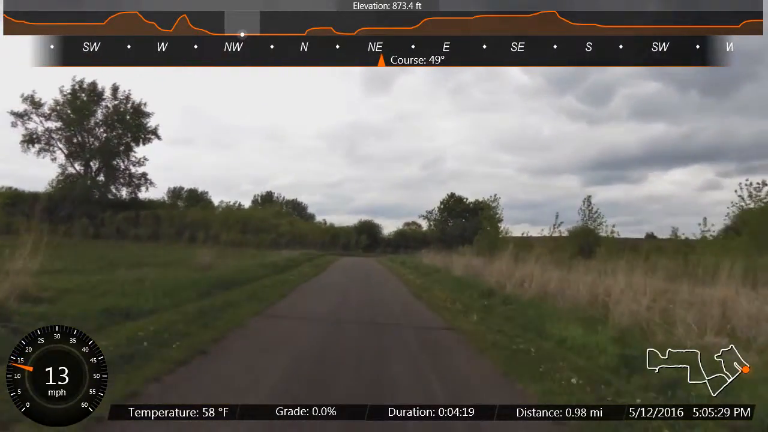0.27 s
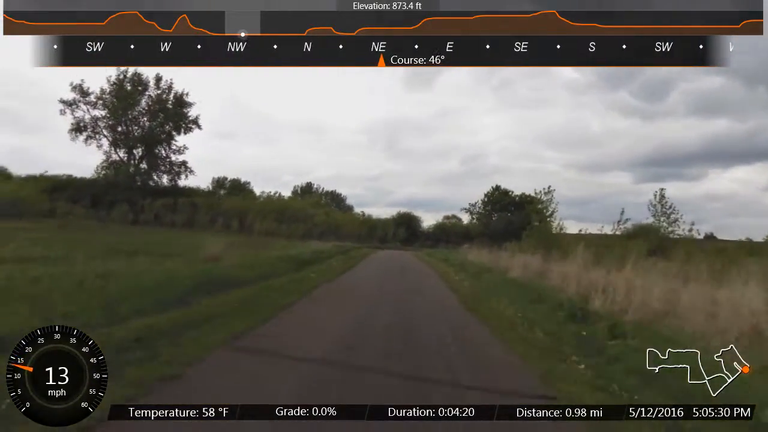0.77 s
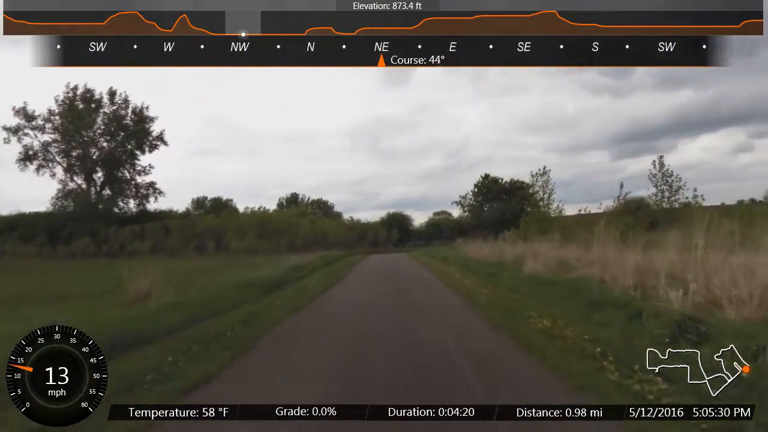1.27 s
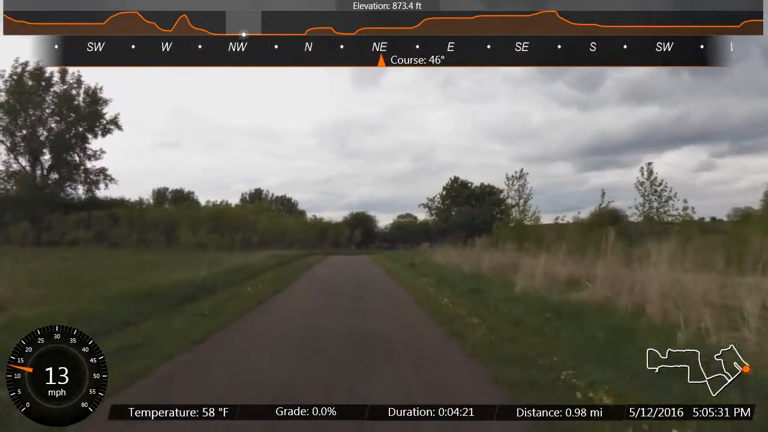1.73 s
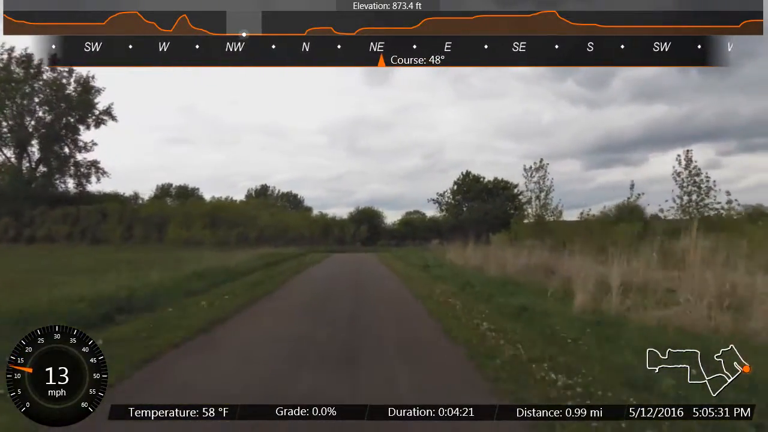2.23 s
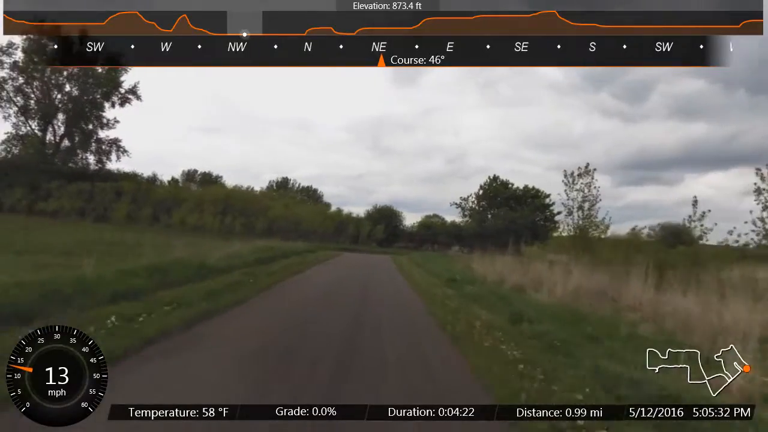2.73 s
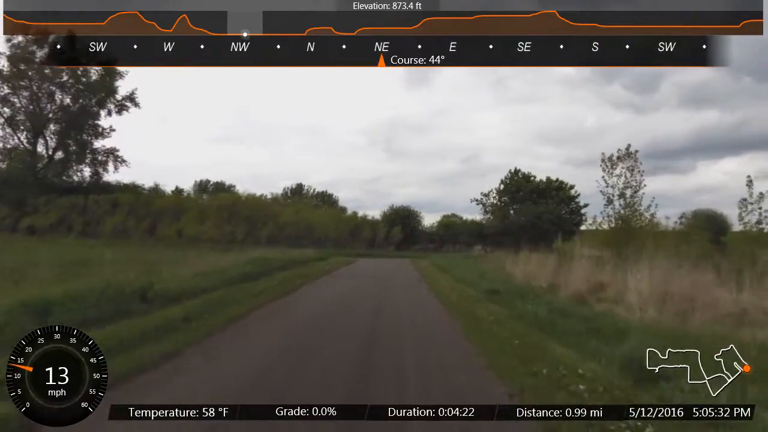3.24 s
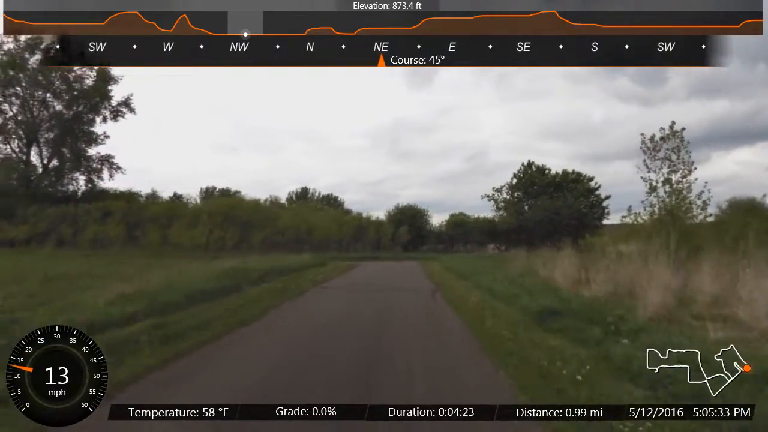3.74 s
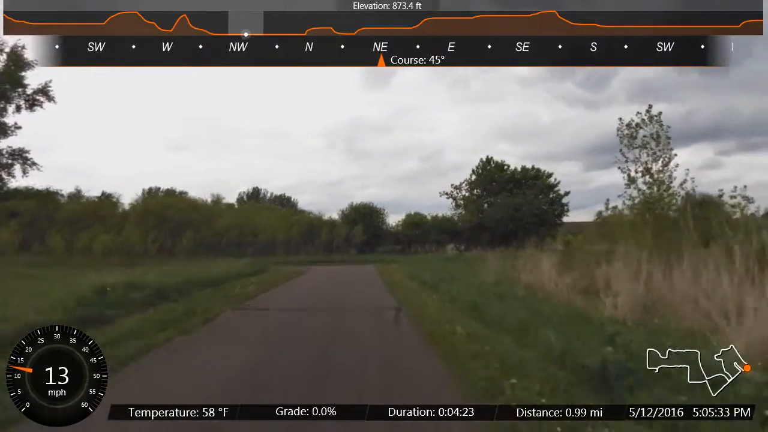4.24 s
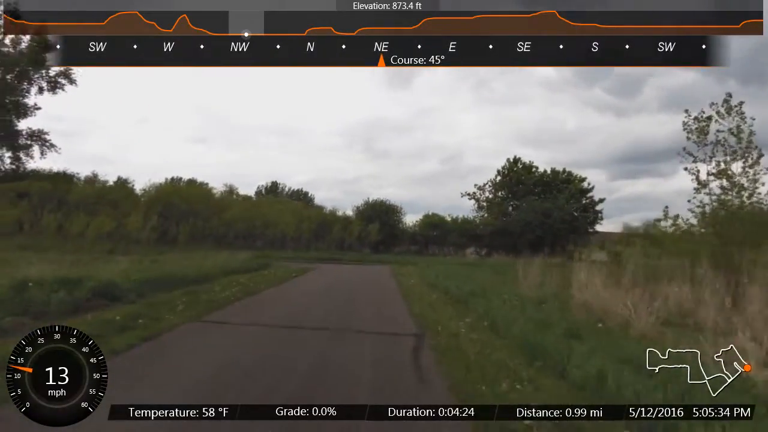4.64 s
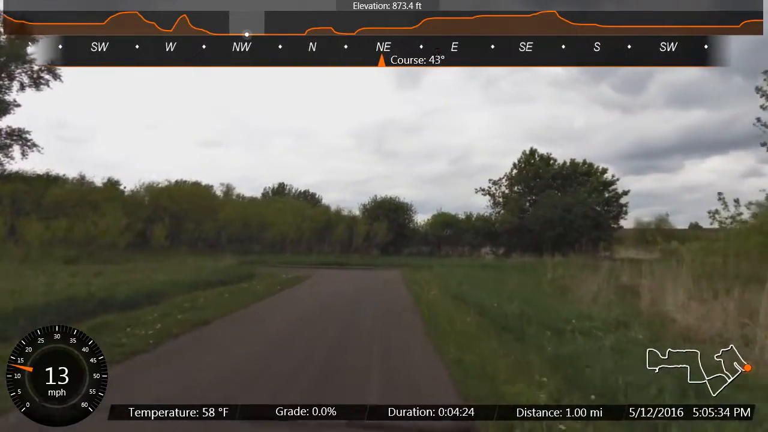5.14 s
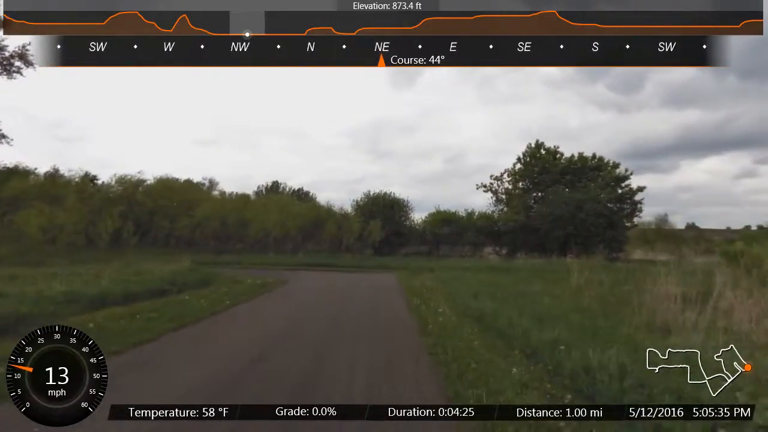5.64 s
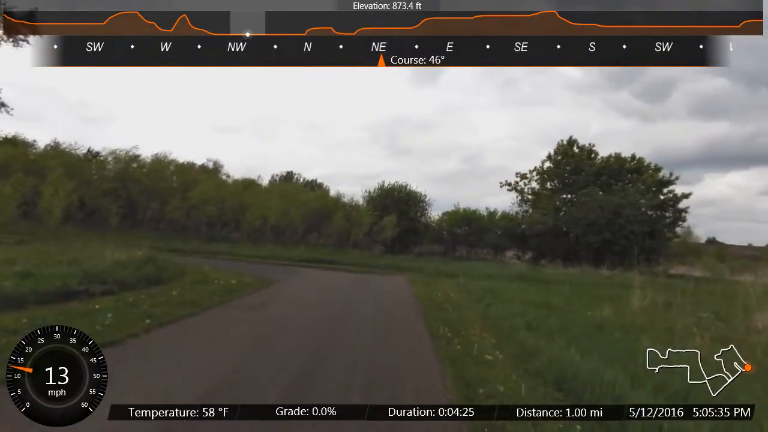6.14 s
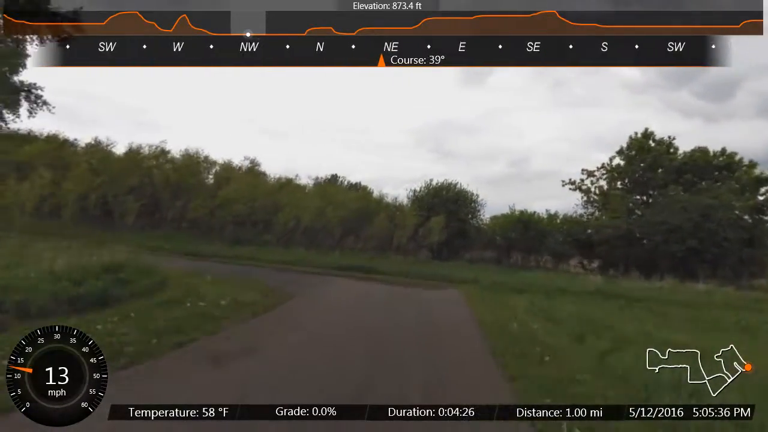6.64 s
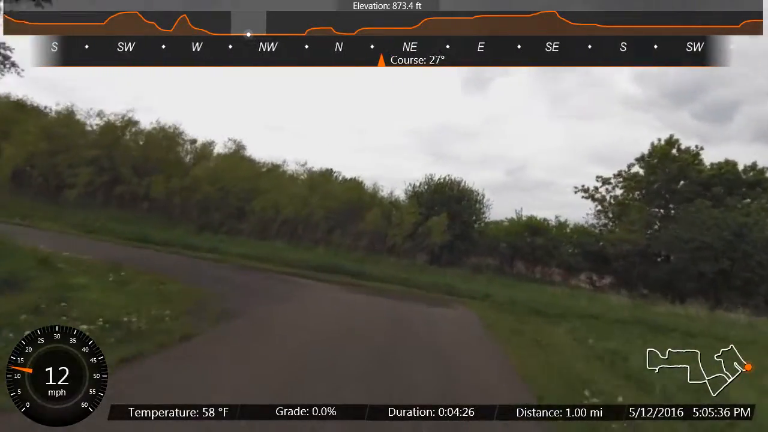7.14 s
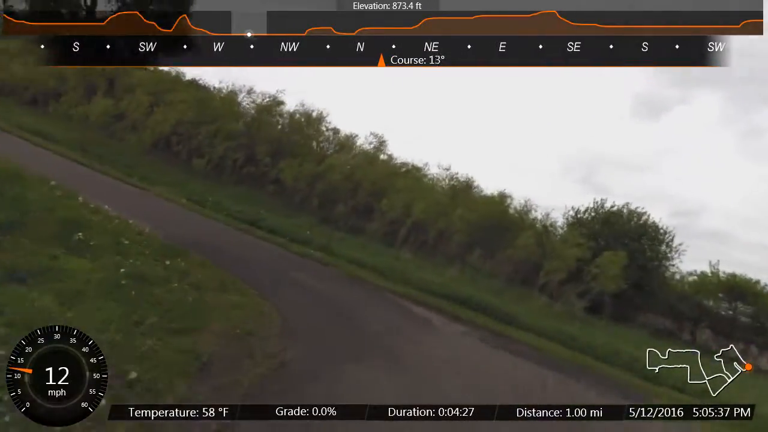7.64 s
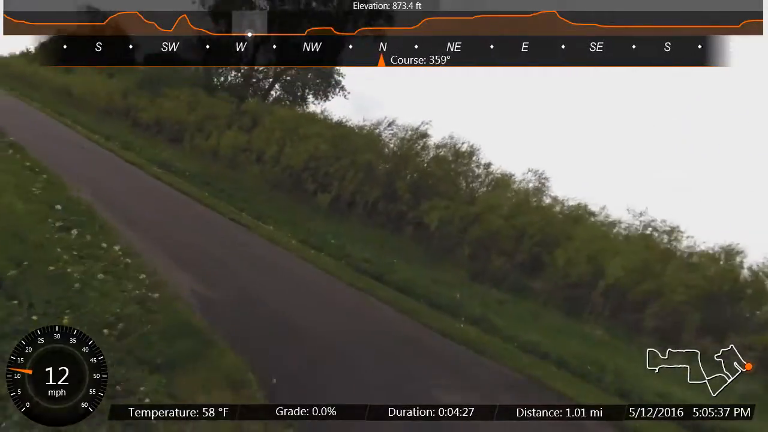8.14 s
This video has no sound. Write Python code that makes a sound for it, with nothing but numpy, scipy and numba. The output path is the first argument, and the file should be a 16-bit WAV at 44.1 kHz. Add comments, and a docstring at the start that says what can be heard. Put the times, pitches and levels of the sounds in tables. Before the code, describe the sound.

Continuous boxy rumble of bicycle tyres on a paved path, close and muffled by the microphone's plastic case. Low wind puffs buffet it while the chain chatters softly and grit ticks. Sharp taps precede two quick thuds as both wheels cross a crack. Smooth rolling follows, then a heavier crunching double blow that distorts and briefly ducks the sound, more rolling, and a final knock.

```python
"""A bicycle rolls along a paved path, heard by a microphone in a plastic case on the handlebar.
From the start asphalt grain makes the case drone near 280 Hz, the chain chatters, grit ticks and gusts buffet low.
Loose parts click and tap; soon, again past the middle and at the very end, a wheel drops into a crack.
The rear wheel follows the front one through the first two: the mount knocks, fittings rattle,
the blows overload the microphone and the gain ducks."""
import sys
import numpy as np
from scipy import signal
from scipy.fft import rfft, irfft
from scipy.io import wavfile
from scipy.ndimage import uniform_filter1d
from numba import njit

SR = 44100
rng = np.random.default_rng(int(sys.argv[2]) if len(sys.argv) > 2 else 0)


def put_to_file(sound):
    """Save the sound as 16-bit audio at rate SR, in the file named by the first command-line argument."""
    columns = np.atleast_2d(sound).T  # one column per channel
    safe = np.clip(columns, -1, 1)
    whole_steps = np.round(safe * 32767)
    wavfile.write(sys.argv[1], SR, whole_steps.astype(np.int16))


N = 370422
TIME = np.arange(N) / SR

# spectrum of hard contacts, for clicks and cracks: (frequency [Hz], relative level [dB per Hz])
CONTACT_SPECTRUM = [(100, -26.5), (600, -15), (1100, 7), (3000, 7.5), (5400, 1), (6500, -17.5),
                    (11000, -46), (16000, -44)]


def undb(db):
    """Decibels to gain."""
    return 10 ** (np.asarray(db) / 20)


def unit(x):
    """Scale to rms 1."""
    return x / np.sqrt(np.mean(x ** 2))


def walk(rate):
    """Random levels held 1 / rate s and smoothed twice, rms 1."""
    hold = max(int(SR / rate), 1)
    steps = np.repeat(rng.standard_normal(N // hold + 1), hold)
    smooth = uniform_filter1d(uniform_filter1d(steps, hold), hold)
    return unit(smooth[:N])


def butter(x, hz, kind, order=2):
    """Plain low- or high-pass."""
    return signal.sosfilt(signal.butter(order, hz, kind, fs=SR, output="sos"), x)


def through_case(x, spectrum, ring=1, size=8192):
    """Colour x with a smooth spectrum and the resonances of the case, as a causal response."""
    # resonances of case and mount: (centre [Hz], width [Hz], lift [dB at ring=1])
    resonances = [(271.6, 80.7, 14.5), (331, 180, 5), (527.5, 30, 5), (674.5, 130, 8), (946.6, 89, 9.5),
                  (1221, 103, 12), (1387, 190, 9.5), (1947, 170, 8.5), (2557, 200, 11.5), (3334, 180, 13),
                  (3960, 140, 6.5), (4220, 380, 1.5), (4874, 550, 11.5), (5300, 160, 3.5), (5740, 230, 7)]
    f = np.maximum(np.fft.rfftfreq(size, 1 / SR), 1)
    hz, db = np.transpose(spectrum)
    db = np.interp(np.log(f), np.log(hz), db)
    db = db + ring * sum(lift / (1 + (2 * (f - centre) / width) ** 2) for centre, width, lift in resonances)
    # folding the cepstrum gives the minimum-phase response
    cepstrum = irfft(np.log(undb(db)))
    cepstrum[1:size // 2] *= 2
    cepstrum[size // 2 + 1:] = 0
    response = irfft(np.exp(rfft(cepstrum)))[:size // 2]
    return signal.oaconvolve(x, response)[:len(x)]


def add(out, start, sound):
    """Mix a sound in at a time in seconds."""
    i = int(max(start, 0) * SR)
    out[i:i + len(sound)] += sound[:max(N - i, 0)]


def grains(rate, spread_db):
    """Random tiny impacts, rate per second, a few much larger than the rest."""
    hit = rng.random(N) < rate / SR
    size_db = spread_db * np.minimum(rng.exponential(size=N), 4)
    return unit(hit * rng.choice([-1, 1], N) * undb(size_db))


def tyres(drone_db, roar_db):
    """Asphalt grain drums through fork and bar: a low drone of the mount with a roar above it."""
    # spectrum of the asphalt's shaking: (frequency [Hz], relative level [dB per Hz])
    asphalt_spectrum = [(20, -30.5), (55, -5), (100, -3), (200, -6), (300, 0.5), (420, -11), (600, -12),
                        (820, -19.5), (1100, -27.5), (1700, -39.5), (3000, -57), (5800, -55.5), (6500, -71),
                        (9000, -100)]
    shaking = grains(rate=4000, spread_db=3.0) * undb(0.85 * walk(40))
    road = through_case(shaking, asphalt_spectrum)
    drone = butter(road, 400, "low", order=4)
    roar = butter(road, 412.6, "high", order=4)
    return unit(drone) * undb(drone_db) + unit(roar) * undb(roar_db)


def chain(db, bursts_hz=19.5, burst_cycles=0.2):
    """Links chatter over the sprockets in uneven bursts, about twenty a second."""
    # spectrum of the chatter: (frequency [Hz], relative level [dB per Hz])
    link_spectrum = [(300, -23.5), (1200, 2.5), (2000, -2), (3200, -4.5), (4200, -13), (5800, -14.5),
                     (6500, -21.5), (8500, -59)]
    phase = np.cumsum(bursts_hz * (1 + .04 * walk(3.3))) / SR
    age = (phase % 1) / burst_cycles
    height_db = 6.3 * np.clip(rng.standard_normal(N)[phase.astype(int)], -2, 2)  # one draw per burst
    burst = (age * np.exp(1 - age)) ** 2 * undb(height_db)
    links = grains(rate=1800, spread_db=2.0) * (0.63 + burst)
    return unit(through_case(links, link_spectrum)) * undb(db)


def flecks(rate, spread_db, ring_s=0.002, size=1024, count=18):
    """Tiny contacts at many places, each place ringing briefly at a pitch of its own; rms 1."""
    # spectrum that colours the contacts, the chain's own: (frequency [Hz], relative level [dB per Hz])
    fleck_spectrum = [(300, -23.5), (1200, 2.5), (2000, -2), (3200, -4.5), (4200, -13), (5800, -14.5),
                      (6500, -21.5), (8500, -59)]
    t = np.arange(size) / SR
    pitches_hz = np.linspace(1200, 6000, count) * (1 + .02 * rng.standard_normal(count))
    contacts = np.zeros(N)
    for hz in pitches_hz:
        ring = np.sin(2 * np.pi * hz * t) * np.exp(-t / ring_s)
        contacts += signal.oaconvolve(grains(rate, spread_db), ring)[:N]
    return unit(through_case(contacts, fleck_spectrum, ring=0.7))


def grit(db=-58, rate=10):
    """Loose specks on the asphalt tick faintly under the tyres."""
    return flecks(rate, spread_db=1.5) * undb(db)


def gusts(breeze_db=-37.5, trim_db=-4.5):
    """Wind level in dB: smooth swells added in power to a steady breeze, all trimmed alike."""
    # gusts over the breeze: (time [s], peak [dB before the trim], Gaussian half length [s])
    swells = [(.08, -27, 0.19), (1.132, -27.5, .08), (1.654, -24.5, 0.12), (2.435, -31, 0.061),
              (3.373, -21.5, 0.062), (5.07, -22.5, 0.076), (5.264, -24, 0.11), (5.602, -32, .08),
              (6.862, -24.5, 0.073), (7.8, -29, 0.29), (8.333, -21, 0.16)]
    power = undb(breeze_db) ** 2
    for peak_s, db, half_s in swells:
        power = power + (undb(db) * np.exp(-.5 * ((TIME - peak_s) / half_s) ** 2)) ** 2
    return 10 * np.log10(power) + trim_db


def wind(db):
    """Eddies, a low noise of unsteady strength, buffet the case without ringing it."""
    # spectrum of the buffeting: (frequency [Hz], relative level [dB per Hz])
    eddy_spectrum = [(15, -27), (35, -15.5), (60, -2.5), (110, 1), (180, -1), (300, -20), (800, -36),
                     (3000, -73), (9000, -110)]
    eddies = rng.standard_normal(N) * undb(2.9 * walk(11))
    return unit(through_case(eddies, eddy_spectrum, ring=0)) * undb(db)


def taps(contact_s=0.00045, size=8192):
    """A loose metal part taps the frame and rings; each tap weights its modes a little differently."""
    # modes of the metal part: (frequency [Hz], level [dB], t60 [s])
    modes = [(940, -11.5, 0.053), (1030, -2, 0.014), (1143, -3.5, 0.036), (1234, 1.5, 0.039),
             (1377, 2.5, 0.0072), (1830, -4, .02), (2105, 0, 0.014), (2440, -2.5, 0.025),
             (3820, -10.5, .035), (4220, -7, 0.019), (4790, 5.5, 0.024), (5090, -13, 0.033),
             (5290, -19.5, 0.086)]
    # taps on the frame: (time [s], level [dB], treble tilt [dB, full from 4800 Hz up])
    tap_times = [(.269, -24.5, -5), (0.2716, -20.5, -18), (.3846, -24.5, 13.5), (.3874, -5, -8),
                 (1.255, -16, -41), (1.279, -9, -32), (1.7657, -21, -49), (5.985, -21.5, -32),
                 (7.901, -55, 11.5)]
    out, t = np.zeros(N), np.arange(size) / SR
    hz, mode_db, t60 = np.transpose(modes)
    rings = np.sin(2 * np.pi * np.outer(hz, t)) * np.exp(-np.log(1000) * np.outer(1 / t60, t))
    height = np.clip(np.log2(hz / 1200) / 2, 0, 1)
    signs = (-1) ** np.arange(len(hz))
    for (start, db, tilt_db), chance in zip(tap_times, rng.standard_normal((len(tap_times), len(hz)))):
        weights = undb(db + mode_db + tilt_db * height + 0.95 * chance) * signs
        add(out, start, weights @ rings * (1 - np.exp(-t / contact_s)))
    return out


def clicks(scrape_s=0.0018, tail_s=0.0088, trim_db=-8.5, size=4096):
    """Loose parts and flung grit hit the frame: brief noisy contacts, each with its own brightness."""
    # clicks on the frame: (time [s], level [dB before the trim], treble over low middle [dB])
    contacts = [(0.2691, -25, -13.5), (0.334, -37.5, 0), (0.3838, -24, 15), (.420, -42, -12),
                (.574, -39.5, 2), (.583, -40, -12), (.644, -17, 5), (.659, -24.5, -17), (.674, -27, -12),
                (.877, -25, -15), (1.28, -17, -36), (1.5427, -28.5, -28.5), (3.0652, -34, -7),
                (4.864, -40, -16), (5.7501, -20.5, -7), (5.795, -31, 7), (5.969, -28, -19),
                (6.1536, -39, -16.5), (8.334, -31.5, -13)]
    out, t = np.zeros(N), np.arange(size) / SR
    envelope = (np.exp(-t / scrape_s) + undb(-23) * np.exp(-t / tail_s)) * (1 - np.exp(-t / 0.00023))
    for (start, db, bright_db), noise in zip(contacts, rng.standard_normal((len(contacts), size))):
        colour = [(f, level + bright_db * np.clip(np.log2(f / 1200) / 2, 0, 1))
                  for f, level in CONTACT_SPECTRUM]
        click = through_case(noise * envelope, colour, ring=0.3)
        add(out, start, unit(click) * undb(db + trim_db))
    return out


def knocks(sway_hz=46, sway_s=0.0048, sway_db=-7, sway_full_db=12.5, crunch_s=0.0028, size=4096):
    """Each blow thuds in the mount, sways the whole case and grinds the joints of the case."""
    # blows of the mount on bumps and at cracks, with 3.5 dB added to the thud and 13 dB to the crunch:
    # (time [s], force [dB], thud pitch [Hz], decay [s], crunch over force [dB])
    blows = [(.4225, -11, 348, 0.0043, -16), (.609, -1.5, 332, 0.0025, -19), (.615, 2.5, 420, 0.0014, -11),
             (.622, 4, 126, 0.0026, -20), (.630, 17, 112.6, 0.004, -16.5), (.637, 18.5, 192, 0.0011, -25),
             (.809, 16, 233, 0.0011, -17), (.818, -2.5, 313, .0033, -10.5), (.832, 10.5, 280, 0.002, -20),
             (.837, 11.5, 122, 0.0029, -22), (.849, 14, 190, 0.0026, -14.5), (1.277, 6, 347, 0.0059, -10),
             (1.284, 0, 710, 0.0019, -9), (1.517, -14, 530, 0.0017, -23), (1.5428, 1.5, 261, .003, -30),
             (1.71, -14.5, 450, .003, -20.5), (5.7031, 3, 334, 0.0022, -16), (5.717, 19, 219, 0.003, -15.5),
             (5.7254, 22.5, 106, 0.004, -15), (5.731, 22.5, 276, 0.0017, -14.5),
             (5.735, 20, 126, .0035, -31), (5.759, 17, 187, 0.0038, -23.5), (5.794, 12, 258, 0.0022, -29.5),
             (5.9037, 19, 201, .0017, -17), (5.913, -3, 288, 0.0033, -9.5), (5.929, 22.5, 116, 0.0023, -21),
             (5.9426, 12.5, 220, .002, -11.5), (8.282, -6, 290, .005, -20.5),
             (8.325, 1.5, 318, 0.0032, -20.5), (8.3685, 10, 392, 0.002, -17.5),
             (8.375, 2, 282, 0.0029, -20), (8.394, 13, 310, 0.0028, -17.5)]
    # spectrum of the grinding joints: (frequency [Hz], relative level [dB per Hz])
    joint_spectrum = [(60, -14), (250, 0), (500, 6), (1000, -7), (2000, -11), (5000, -27), (6500, -33),
                      (14000, -49)]
    thuds, grind, t = np.zeros(N), np.zeros(N), np.arange(size) / SR
    sway = undb(sway_db) * np.sin(2 * np.pi * sway_hz * t) * np.exp(-t / sway_s)
    contact = 1 - np.exp(-t / 0.0005)  # the rubber pad takes up the load gradually
    for (start, db, hz, decay_s, crunch_db), noise in zip(blows, rng.standard_normal((len(blows), size))):
        thud = -np.sin(2 * np.pi * hz * t) * np.exp(-t / decay_s)
        sway_share = min(undb(db - sway_full_db), 1)  # lighter blows sway the case less
        add(thuds, start, undb(db + 3.5) * contact * (thud + sway * sway_share))
        add(grind, start, undb(db + crunch_db + 13) * contact * noise * np.exp(-t / crunch_s))
    return thuds + through_case(grind, joint_spectrum)


def swell(peak, rise_s, fall_s):
    """Envelope that grows up to a moment and dies away after it."""
    return np.exp(-np.maximum((peak - TIME) / rise_s, (TIME - peak) / fall_s))


def cracks(rattle_rate=35, clump_db=4.5):
    """Each wheel in turn crunches through a crack and leaves the chain and fittings rattling in clumps."""
    # cracks across the path, levels for the front wheel:
    # (time the front wheel drops in [s], crunch [dB], lead-in over broken asphalt [s], rattle [dB])
    crossings = [(0.63, -30, .15, -36), (5.726, -23.5, .02, -44.5), (8.385, -34.5, 0.093, -37.5)]
    wheelbase_m, speed_m_s = 1.16, 5.8
    rear_db = -6.5  # the rear wheel is further from the microphone
    crunch_rise_s, crunch_fall_s, rattle_fall_s = 0.0094, .018, 0.14
    crunch, rattle = np.zeros(N), np.zeros(N)
    for front, crunch_db, lead_s, rattle_db in crossings:
        rear = front + wheelbase_m / speed_m_s
        for hit, wheel_db in ((front, 0), (rear, rear_db)):
            crunch += undb(crunch_db + wheel_db) * swell(hit, crunch_rise_s, crunch_fall_s)
            rattle = np.maximum(rattle, undb(rattle_db + wheel_db) * swell(hit, lead_s, rattle_fall_s))
    crunching = unit(through_case(grains(rate=4000, spread_db=5.0), CONTACT_SPECTRUM, ring=.5))
    rattling = flecks(rattle_rate, spread_db=2.0) * undb(clump_db * walk(130))
    return crunch * crunching + rattle * rattling


def scene():
    """Rolling, wind and jolts, all arriving at one microphone."""
    # how hard the asphalt shakes the bike: (time [s], level [dB before the drone's 1.1 dB cut])
    road_levels = [(0, -22), (.9, -20.5), (1.6, -22), (2.8, -21), (3.9, -22.8), (4.5, -22.8), (5.2, -22.5),
                   (6.5, -20), (7.2, -21.5), (7.6, -20), (8.1, -19.5), (8.4, -20)]
    road_db = np.interp(TIME, *np.transpose(road_levels))
    # the roar follows a fifth of the road's swings
    roar_db = -31 + 0.2 * (road_db - road_db.mean()) + 1.8 * walk(5.6)
    chain_db = -52 + 1.5 * walk(4.2)
    rolling = tyres(road_db - 1.1, roar_db) + chain(chain_db) + grit()
    jolts = taps() + clicks() + knocks() + cracks()
    return (rolling + wind(gusts()) + jolts)[None]


@njit
def follow(x, attack, release):
    """Level follower, quick to rise and slow to fall."""
    out, e = np.empty(len(x)), 0.
    for i in range(len(x)):
        e += (abs(x[i]) - e) * (attack if abs(x[i]) > e else release)
        out[i] = e
    return out


def record(dry, rail=0.92, knee=0.33, attack_s=.011, release_s=0.056, squeeze=0.46, ceiling=.75, top_hz=15800):
    """Gain ducks after loud blows; the input still saturates, its flat tops droop, peaks are rounded off."""
    level = follow(dry[0], 1 / (attack_s * SR), 1 / (release_s * SR))
    ducked = dry[0] * np.maximum(level / knee, 1) ** -squeeze
    saturated = rail * np.tanh(ducked / rail)
    drooped = butter(saturated, 37, "high", order=1)
    rounded = drooped / (1 + (drooped / ceiling) ** 6) ** (1 / 6)
    # steep cut at the top of the microphone's band
    return signal.sosfilt(signal.ellip(8, .2, 70, top_hz, fs=SR, output="sos"), rounded)[None]


dry = scene()
out = record(dry)
put_to_file(out)
```